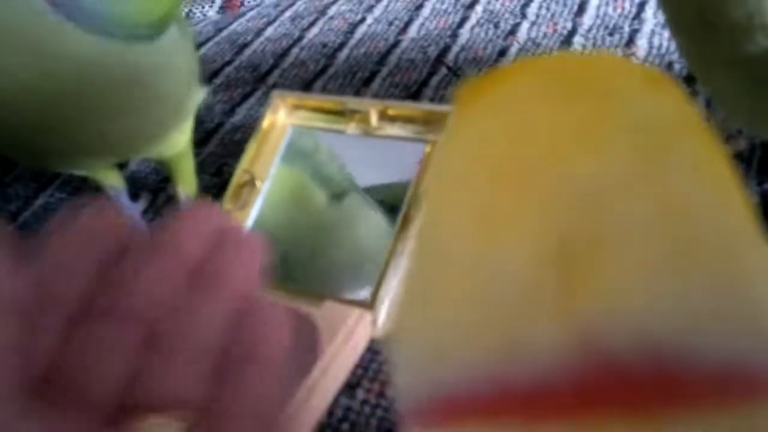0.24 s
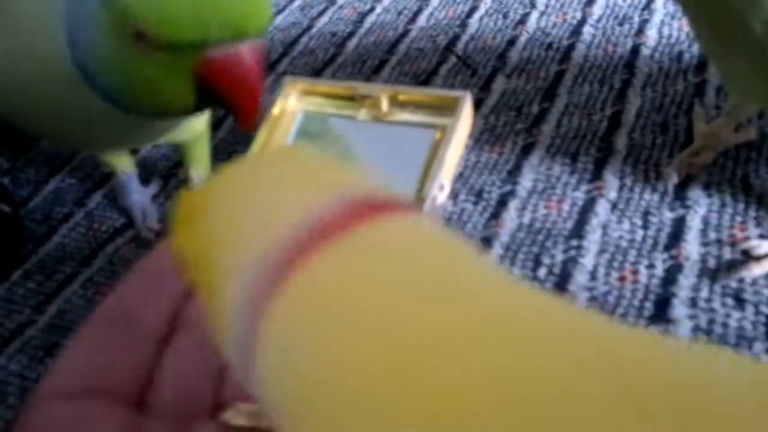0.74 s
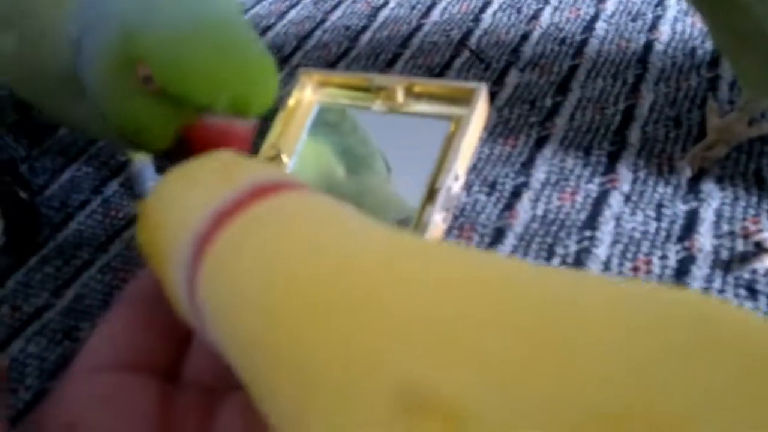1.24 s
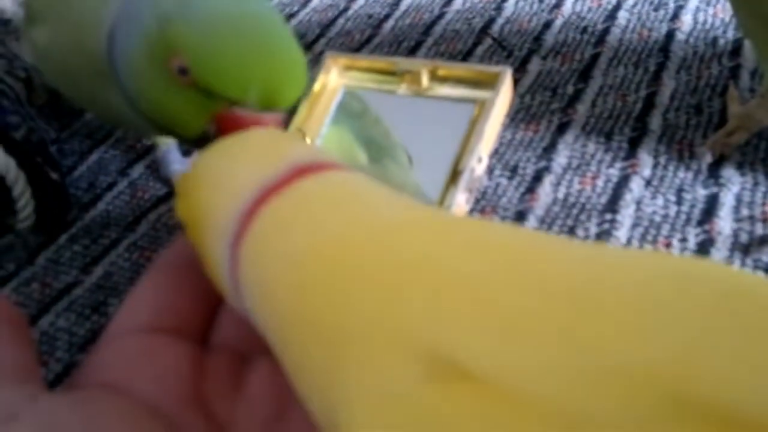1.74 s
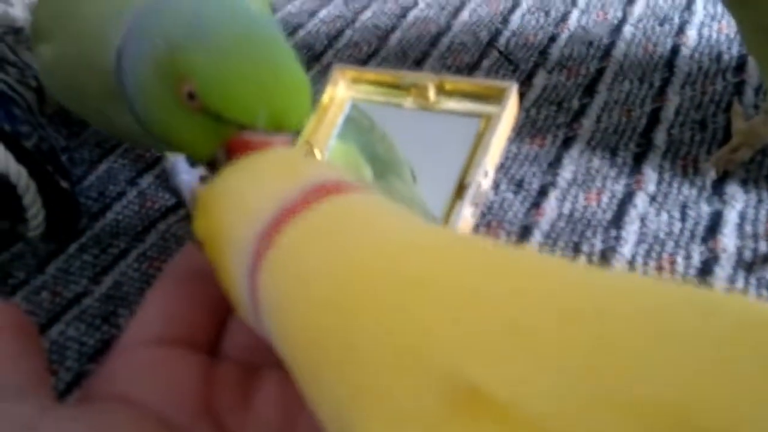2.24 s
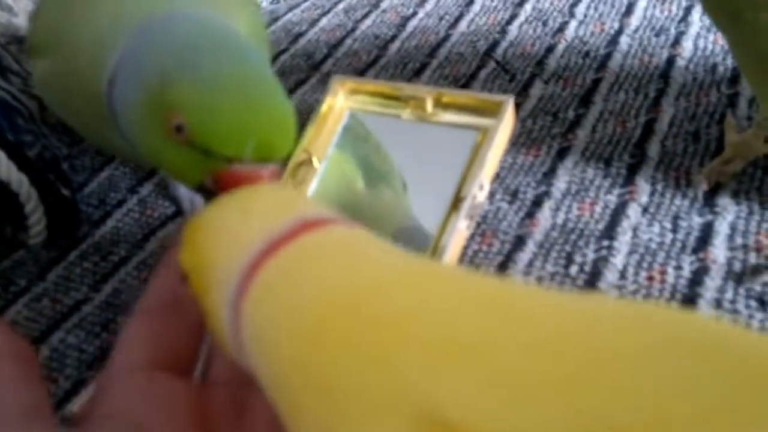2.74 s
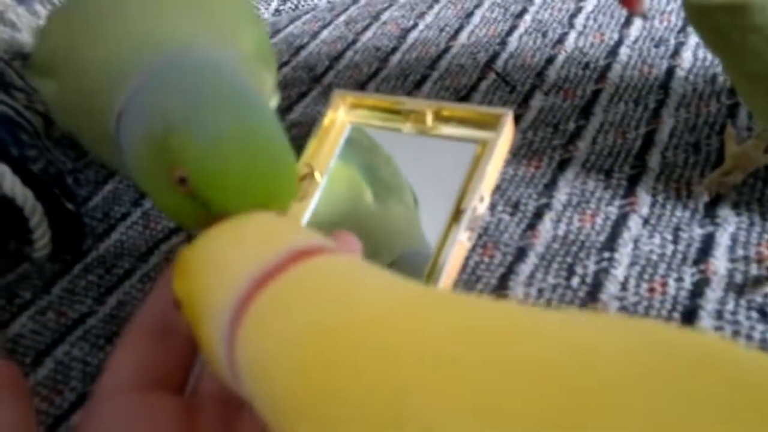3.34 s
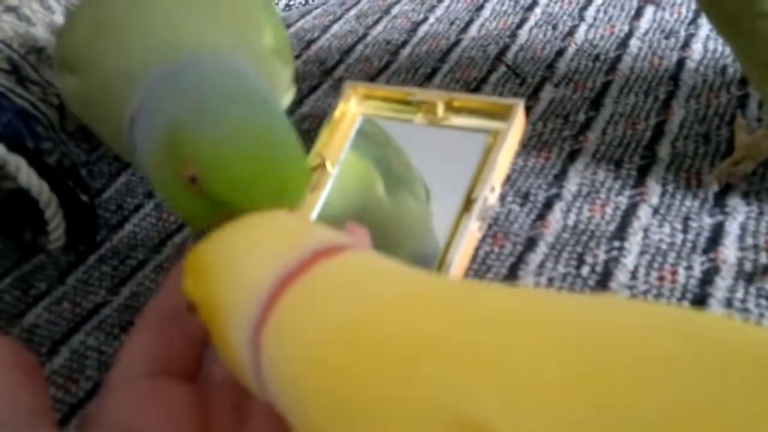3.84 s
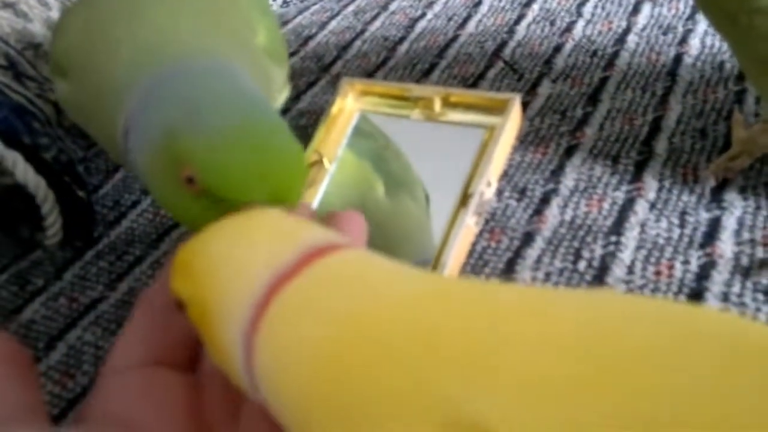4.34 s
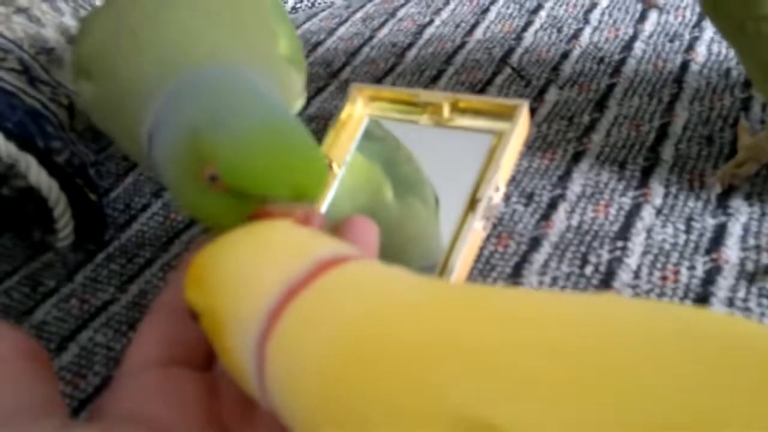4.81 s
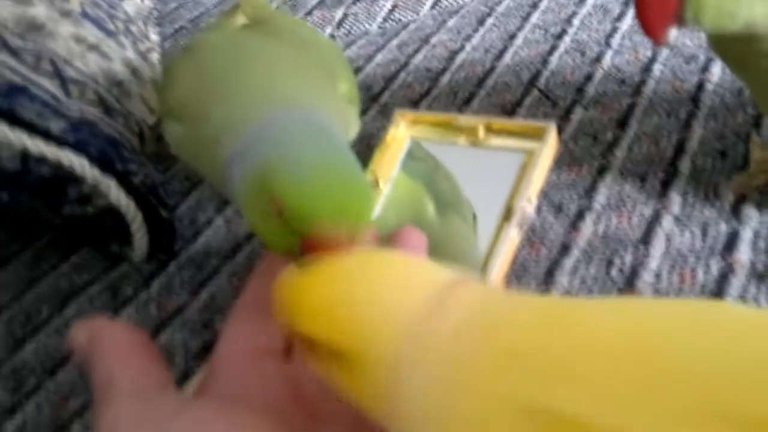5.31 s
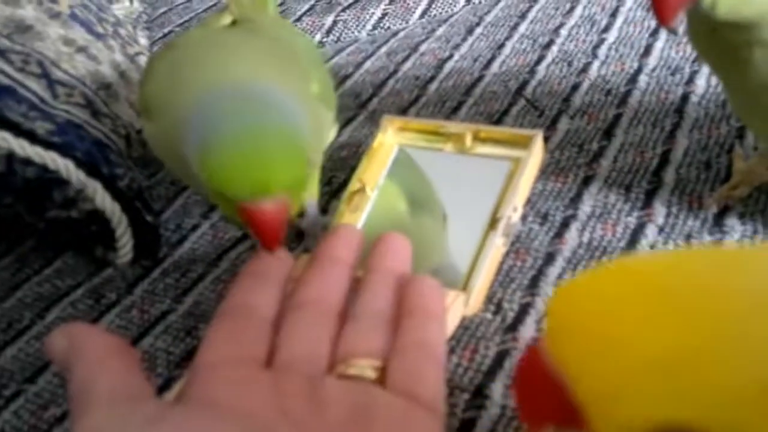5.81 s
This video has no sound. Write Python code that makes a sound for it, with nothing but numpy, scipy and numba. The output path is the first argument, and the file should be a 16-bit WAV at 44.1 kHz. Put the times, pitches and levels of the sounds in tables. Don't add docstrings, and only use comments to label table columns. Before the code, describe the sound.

Sharp, dry parrot clucks about four per second build from faint peeps to a loud middle, then die away over soft hiss indoors.

```python
import sys
import numpy as np
from scipy import signal
from scipy.fft import rfft, irfft
from scipy.io import wavfile
from scipy.ndimage import uniform_filter1d
from numba import njit

SR = 44100
rng = np.random.default_rng(int(sys.argv[2]) if len(sys.argv) > 2 else 0)


def persist_wave(psi):
    counts = np.round(np.clip(psi, -1, 1) * 32767).astype(np.int16)
    wavfile.write(sys.argv[1], SR, np.atleast_2d(counts).T)


def linear_from_db(decibels):
    return 10 ** (np.asarray(decibels, float) / 20)


N = 267334
TIME = np.arange(N) / SR
SIDES = np.array([[1], [-1]])


# (start [s], length [s], effort after attack [dB], effort before release [dB], tone [Hz])
NOTES = [(0.822, .022, -50, -65, 2616), (1.16, 0.032, -49.5, -59.5, 2580), (1.35, .024, -23, -44, 2510),
         (1.59, 0.065, -20, -34.5, 2700), (1.813, .054, -20, -27.5, 2600), (2.041, .049, -16.5, -18, 2500),
         (2.278, 0.049, -21.5, -15, 2834), (2.538, 0.038, -14, -18, 2527), (2.776, 0.042, -24.5, -17, 2580),
         (3.029, .039, -21.5, -23, 2498), (3.268, .04, -28, -28, 2280), (3.528, .043, -23.5, -19.5, 2436),
         (3.785, 0.043, -16.5, -22, 2834), (4.043, .04, -28, -20, 2474), (4.302, .045, -23.5, -12.5, 2720),
         (4.594, .058, -33.5, -46.5, 1850), (4.891, 0.043, -22.5, -42, 1679),
         (5.167, .042, -42, -49.5, 1680), (5.437, .033, -56.5, -57, 2480)]
# (multiple of the tone [1], width [Hz], level [dB])
THROAT_MODES = [
    (1., 300, 0),
    (.75, 500, -12),
    (1.5, 500, -20),
]
# (centre [Hz], width [Hz], level [dB])
UPPER_MODES = [
    (3350, 450, 0),
    (3850, 500, -2),
    (4800, 800, -13),
]
# (multiple of the pipe resonance [1] or fixed centre [Hz], width [Hz], level [dB])
WINDPIPE_MODES = [
    (1., 280, 0),
    (1.45, 400, -7),
    (600, 200, -7),
]
# (centre [Hz], width [Hz], level [dB])
BEAK_MODES = [
    (6100, 1100, -1),
    (8000, 900, -13),
    (10300, 1600, 0),
    (14200, 600, -17),
]
# (centre [Hz], width [Hz], level [dB])
RASP_MODES = [
    (1500, 800, 4.5),
    (3000, 1660, -0.5),
    (5000, 2600, -12),
]


def clucks():
    gate, columns = play([cluck(*note) for note in NOTES], 0.008)
    effort_db, tone_hz, upper_db, pipe_hz, pipe_db, beak_db, rasp_db = columns
    drive = pops(1200, 4.2, 1.38)
    gain = gate * linear_from_db(effort_db)
    slack = np.maximum(2600 / tone_hz, 1) ** 3
    throat = [(m * tone_hz, width * slack, db) for m, width, db in THROAT_MODES]
    windpipe = [(m * pipe_hz if m < 10 else m, width, db) for m, width, db in WINDPIPE_MODES]
    voice = 0.71 * ring(drive, gain, throat)
    voice = voice + ring(drive, gain * linear_from_db(upper_db), UPPER_MODES)
    voice = voice + ring(drive, gain * linear_from_db(pipe_db), windpipe)
    hiss_db = beak_db - 8.5 + 4.0 * walk(140)
    voice = voice + ring(pops(3000, 1.5, 3.7), gain * linear_from_db(hiss_db), BEAK_MODES)
    voice = voice + ring(drive, gain * linear_from_db(rasp_db), RASP_MODES)
    puff_modes = [(203, 220, 0), (70, 80, -3)]
    puff = [ring(rng.standard_normal(N), gain * linear_from_db(-35.5), puff_modes) for _ in SIDES]
    return voice * linear_from_db(-0.5) + strong_pops(), np.array(puff)


# (time [s], windpipe [Hz], windpipe level [dB], beak gape [dB], rattle [dB])
NECK = [(1.0, 1020, 1.5, -21, -26), (1.36, 880, -6.5, -28, -11.5), (1.62, 1100, -11.5, -36, -12.5),
        (1.82, 1110, -11, -38, -12.5), (1.85, 690, -8, -37, -14.5), (2.06, 1030, -13.5, -30, -14),
        (2.31, 622, -14, -30.5, -13), (2.56, 1030, -13.5, -31, -16), (2.8, 616, -12.5, -27, -11),
        (3.05, 1100, -14, -37, -12), (3.29, 1275, -10, -23, -9.5), (3.8, 1130, -15, -43.5, -14.5),
        (4.07, 1160, -15.5, -35, -9), (4.33, 765, -13, -29, -9.5), (4.61, 820, -0.5, -10.5, 5.5),
        (4.9, 1002, -6, -28, -9), (5.18, 845, 2.5, -17, 3.5), (5.45, 965, 4.5, -13.5, 1.5)]
UPPER_OPENING = [-15, -16, -4.5, -8]
PIPE_OPENING = [-2, -0.5, 3, 1.5]
BEAK_OPENING = [3, 4.5, -4.5, 2.5]


def cluck(s, length, early_db, late_db, hz):
    attack_s, release_s = 0.0073, 0.016
    onset_db, fade_db = -16.5, -16.5
    tension_rise_per_s = 0.92
    hold_end = max(length - release_s, attack_s + 0.0011)
    t = np.array([0, attack_s, hold_end, max(length, attack_s + 0.002)])
    neck_s, *posture = np.transpose(NECK)
    pipe_hz, pipe_db, gape_db, rasp_db = (np.interp(s + t, neck_s, c) for c in posture)
    effort_db = [early_db + onset_db, early_db, late_db, late_db + fade_db]
    return np.transpose([s + t, effort_db, hz * (1 + tension_rise_per_s * t), UPPER_OPENING,
                         pipe_hz, pipe_db + PIPE_OPENING, gape_db + BEAK_OPENING, rasp_db])


# (time [s], peak [dB], pitch [Hz], rebound level [dB])
STRONG_POPS = [(1.3597, -17, 2680, -15), (1.5986, -12.5, 2495, -1.5), (1.6228, -18, 3010, 0),
               (1.8212, -10.5, 2256, -30), (1.8473, -7, 2717, 0.5), (2.0516, -8, 2480, -29),
               (2.0598, -2.5, 2690, -32), (2.0727, -10, 2850, 3.5), (2.2876, -13.5, 2490, -32),
               (2.299, -5, 2896, -5), (2.309, -12, 3120, -30.5), (2.3166, -4.5, 2914, -30),
               (2.545, -12, 2600, -27.5), (2.553, -6.5, 2550, -27), (2.5626, -8, 2690, -2),
               (2.789, -7.5, 2710, -31), (2.797, -6, 2627, -30), (2.8046, -7, 2840, -27),
               (3.045, -15, 2423, 7), (3.2802, -16, 2300, 4), (3.2923, -19.5, 2570, -31.5),
               (3.5383, -13, 2420, -2), (3.5506, -13, 2340, 5), (3.794, -11, 2650, 1),
               (4.055, -15, 2295, -1.5), (4.0742, -15, 2850, -34), (4.3163, -14.5, 2370, 3.5),
               (4.3266, -10.5, 3035, -3.5), (4.6015, -24, 2810, -27), (4.9013, -26, 2020, -34.5)]


def strong_pops():
    rebound_s, rebound_pitch = 0.0048, 1.2
    first = [(s, db, hz) for s, db, hz, _ in STRONG_POPS]
    rebound = [(s + rebound_s, db + more_db, hz * rebound_pitch) for s, db, hz, more_db in STRONG_POPS]
    return accents(first + rebound, 0.0013, 0.002, 7.0, 1.1)


# (time [s], peak [dB], pitch [Hz])
PEEPS = [
    (.834, -52, 2545),
    (1.033, -60, 2510),
    (1.176, -38, 2720),
]


def peeps():
    return accents(PEEPS, 0.0017, 0.0047, 0.46, 0.355)


def pops(rate, scatter_db, breath):
    chance = rng.random(N) < rate / SR
    train = unit(chance * linear_from_db(scatter_db * rng.standard_normal(N)))
    return unit(train + breath * rng.standard_normal(N))


def accents(table, rise_s, fall_s, glide, partner):
    lead = 300
    out = np.zeros(N)
    t = TIME[:3 * lead] - lead / SR
    for s, db, hz in table:
        turn = 2 * np.pi * rng.random(2)
        phase = 2 * np.pi * hz * t * (1 + glide * t)
        wave = np.sin(0.97 * phase + turn[0]) + 0.3 * np.sin(partner * phase + turn[1])
        swell = np.exp(-(t / np.where(t < 0, rise_s, fall_s)) ** 2)
        i = int(s * SR) - lead
        out[i:i + len(t)] += linear_from_db(db) * wave * swell
    return out


# (time [s], peak [dB], main pitch [Hz], length [s], treble level [dB])
TICKS = [(0.101, -51, 2340, 0.033, -41), (0.133, -40, 2250, 0.031, -46), (1.342, -52, 2950, 0.0047, -0.5),
         (1.418, -51, 2650, 0.027, -18), (1.558, -39.5, 2450, 0.02, -19.5), (1.731, -56, 1910, 0.011, -33),
         (2.91, -35.5, 2310, 0.019, -25.5), (2.921, -40, 1930, 0.021, -45),
         (3.171, -39.5, 2260, 0.029, -44), (3.2, -33.5, 1440, 0.014, -25), (3.316, -33, 3250, 0.024, -18.5),
         (3.441, -44.5, 2350, 0.03, -28), (3.477, -31.5, 2040, 0.019, -20.5), (3.726, -36, 2070, 0.06, -28),
         (3.969, -37.5, 2490, 0.03, -24), (4, -35, 3200, 0.024, -42), (4.245, -46.5, 2100, 0.015, -33),
         (4.482, -44, 2290, 0.012, -41), (4.8, -57, 3200, 0.0084, -35), (4.873, -56.5, 1500, .012, -39.5),
         (5.497, -58.5, 2800, 0.016, -38), (5.806, -38, 1583, 0.032, -12.5)]


def ticks():
    out, size = np.zeros((2, N)), SR // 12
    for s, db, hz, length, treble_db in TICKS:
        t = np.arange(size) / SR / max(length, 0.002)
        grit = rng.standard_normal((2, size)) * linear_from_db(3.5 * rng.standard_normal(size))
        grit = grit[0] + 0.84 * SIDES * grit[1]
        tick = [unit(band(g, hz, 550)) + 0.65 * unit(band(g, 960, 800)) + 0.39 * unit(band(g, 2500, 1500))
                + linear_from_db(treble_db) * unit(band(g, 7500, 3900)) for g in grit]
        i = int(s * SR) - 90
        n = min(size, N - i)
        swell = np.minimum(3 * t, 1) ** 2 * np.exp(-t ** 2)
        pan_db = 1
        out[:, i:i + n] += (linear_from_db(db - 7.0 + SIDES * pan_db / 2) * swell * tick)[:, :n]
    return out


# (time [s], length [s], centre [Hz], width [Hz], level [dB])
BRUSHES = [(.0, 0.07, 1730, 900, -59.5), (.0, 0.03, 7750, 5000, -65), (.11, 0.041, 3480, 2500, -83),
           (0.385, 0.094, 8140, 4000, -74.5), (0.643, .06, 8000, 5000, -80),
           (5.098, 0.036, 11770, 2970, -79), (5.364, 0.044, 12430, 2530, -85),
           (5.734, 0.0497, 3470, 1496, -72), (5.812, 0.051, 5360, 890, -53), (5.813, 0.03, 9650, 3500, -57),
           (5.972, 0.083, 9000, 2930, -78)]


def brushes():
    out = np.zeros((2, N))
    for s, length, hz, width_hz, db in BRUSHES:
        t = TIME[:3500] / max(length, 0.005)
        i = int(max(s, 0) * SR)
        hiss = [unit(band(rng.standard_normal(len(t)), hz, width_hz)) for _ in SIDES]
        swell = np.minimum(5 * t + 0.11, 1) * np.exp(-2.5 * t ** 2)
        out[:, i:i + len(t)] += linear_from_db(db) * swell * hiss
    return out


# (time [s], left minus right [dB], share to the walls [dB], dull share to the walls [dB])
HEAD = [(1.17, 2, -23, -6.5), (1.36, 3, -16.5, -7), (1.6, -1, -10.5, -4), (1.85, 0, -9, -5),
        (2.049, 1.5, -5, -9), (2.551, 1.5, -7.5, -10.5), (3.05, 2.5, -2, -6.5), (3.3, 0, -1.5, -6),
        (3.55, 0, -8, -7.5), (3.799, 0, -6, -2), (4.062, 2.5, -7.5, -4), (4.32, 3, -11.5, -3.5),
        (4.6, 5.5, -7, -16.5), (4.9, -2, -10, -21.5), (5.18, 2, -13, -26), (5.451, 14, -3.5, -18.5)]


def turned_head():
    s, *columns = np.transpose(HEAD)
    return [np.interp(TIME, s, c) for c in columns]


def close_echoes(voice):
    out, t = np.zeros((2, N)), TIME[:600]
    for s, length, *_ in NOTES:
        i, j = int((s - 0.01) * SR), int((s + length + 0.03) * SR)
        for side in out:
            arrivals = rng.random(len(t)) < 4000 / SR
            taps = arrivals * rng.standard_normal(len(t)) * np.exp(-t / 0.0025) * 0.8
            taps[0] = 1
            side[i:j + len(t) - 1] += np.convolve(voice[i:j], taps / np.linalg.norm(taps))
    return out


# (centre [Hz], time to fall 60 dB [s], level [dB])
ROOM = [(523, 0.21, -19), (990, 0.45, -24.5), (1600, 0.29, -13), (2220, 0.33, -21), (3330, 0.089, -22.5),
        (3170, 0.19, -17.5), (4000, 0.15, -15.5), (5000, 0.22, -14.5), (9000, 0.2, -23.5)]


def room(x):
    t = TIME[:SR // 2]
    out = []
    tails = [sum(linear_from_db(db - 60 * t / t60) * band(rng.standard_normal(len(t)), hz, 0.5 * hz)
                 for hz, t60, db in ROOM) for _ in SIDES]
    for tail in tails:
        response = tail * np.minimum(t / 0.00067, 1) * linear_from_db(-20.5)
        out.append(signal.fftconvolve(x, response)[:N])
    return np.array(out)


# (start [s], rise [s], fall [s], peak [dB], pitch [Hz])
FAR_RASPS = [
    (.24, 0.045, 0.088, -63.5, 1860),
    (0.631, 0.036, .11, -61, 1850),
    (1.46, 0.042, 0.082, -72.5, 1600),
    (1.769, 0.065, 0.024, -49, 1375),
    (5.66, .04, .03, -72.5, 1440),
    (5.732, .035, 0.071, -58.5, 1378),
]


def far_bird():
    edge_db = -26
    tables = [[(s, db + edge_db, hz), (s + rise, db, hz), (s + rise + fall, db + edge_db, hz)]
              for s, rise, fall, db, hz in FAR_RASPS]
    gate, (db, hz) = play(tables, 0.012)
    modes = [(hz, 700, 0), (hz * 1.283, 600, -4), (4700, 600, -20)]
    return 3.75 * np.array([ring(pops(1900, 1.3, 1.8), gate * linear_from_db(db), modes) for _ in SIDES])


# (time [s], level [dB])
WHISTLE = [
    (0, -48),
    (.04, -55.5),
    (.1, -74),
    (.14, -64),
]


def whistle():
    whistle_hz, beat_hz = 2620, 55
    gate, (db,) = play([WHISTLE], 0.0035)
    phase = 2 * np.pi * whistle_hz * TIME
    throb = np.array([np.cos(2 * np.pi * beat_hz * TIME + lag) + 1.8 for lag in (0.3, 1.3)])
    octave = 0.68 * np.exp(-TIME / 0.011) * np.sin(2.02 * phase)
    pure = throb * gate * linear_from_db(db) * (np.sin(phase) + octave)
    modes = [(whistle_hz, 120, 0), (1.8 * whistle_hz, 300, -14), (4600, 900, -19)]
    echo = [ring(rng.standard_normal(N), gate * linear_from_db(db + 1.5), modes) for _ in SIDES]
    return 1.4 * pure + np.array(echo)


# (frequency [Hz], density [dB per Hz])
AIR = [(15, -33), (25, -8), (69, -13), (107, -19.5), (253, -18), (322, -26.5), (359, -25), (804, -27.5),
       (1140, -29), (3090, -34.5), (15500, -51.5)]


def air():
    air_db = -72
    hiss = unit(colour(rng.standard_normal((2, N)), AIR))
    rumble = np.array([unit(band(rng.standard_normal(N), 61, 40)) for _ in SIDES])
    rumble_db = air_db - 4 + 3.5 * walk(13)
    return linear_from_db(air_db + 2.5) * hiss + linear_from_db(rumble_db) * (rumble + 0.4 * rumble[0])


@njit
def svf(x, g, k):
    y, b, l = np.empty(len(x)), 0., 0.
    for i in range(len(x)):
        v = (b + g[i] * (x[i] - l)) / (1 + g[i] * (g[i] + k[i]))
        b, l, y[i] = 2 * v - b, l + 2 * g[i] * v, k[i] * v
    return y


def band(x, hz, width_hz):
    g = np.tan(np.pi * hz / SR) + 0 * x
    k = 1.282 * width_hz / hz + 0 * x
    return svf(svf(x + 1e-18, g, k), g, k)


def ring(drive, gain, modes):
    live = uniform_filter1d(1. * (gain > 1e-9), size=1500) > 1e-4

    def through(x):
        total = 0
        for k, (hz, width, db) in enumerate(modes):
            mode = band(x[live], (hz + 0 * x)[live], (width + 0 * x)[live])
            total = total + (-1) ** k * linear_from_db(db) * mode
        return total

    out = np.zeros(N)
    out[live] = through(drive * gain) / np.std(through(drive))
    return out


def unit(x):
    return x / np.sqrt(np.mean(x ** 2))


def colour(x, points):
    hz, db = np.transpose(points)
    f = np.maximum(np.fft.rfftfreq(x.shape[-1], 1 / SR), 1)
    return irfft(rfft(x) * linear_from_db(np.interp(np.log(f), np.log(hz), db)), x.shape[-1])


def play(tables, edge_s):
    s, *columns = np.concatenate(tables).T
    gate = sum((TIME >= t[0][0]) & (TIME < t[-1][0]) for t in tables)
    size = max(int(edge_s * SR), 1)
    return uniform_filter1d(np.minimum(gate, 1.), size), [np.interp(TIME, s, c) for c in columns]


def walk(rate):
    k = int(SR / rate)
    held = np.repeat(rng.standard_normal(N // k + 1), k)
    return unit(uniform_filter1d(uniform_filter1d(held, k), k)[:N])


def scene():
    voice, puff = clucks()
    pan_db, wet_db, dull_db = turned_head()
    small = ticks()
    send = voice * linear_from_db(wet_db) + band(voice, 1748, 1000) * linear_from_db(dull_db + 6) + 0.5 * small.mean(axis=0)
    near = close_echoes(voice) * linear_from_db(SIDES * pan_db / 2) + puff + small + peeps()
    return near + brushes() + room(send) + far_bird() + whistle() + air()


# (frequency [Hz], left minus right [dB])
PORTS = [(200, 2), (700, 5.5), (1300, -3), (4400, 0.5), (8000, 11.5), (15000, 8)]


def shade_ports(dry):
    left = colour(dry[0], [(hz, db / 2) for hz, db in PORTS])
    right = colour(dry[1], [(hz, -db / 2) for hz, db in PORTS])
    return np.array([left, right])


def band_limit(x):
    return signal.sosfilt(signal.butter(12, 16270, fs=SR, output="sos"), x)


def record(dry):
    mix = shade_ports(dry)
    return band_limit(mix)


dry = scene()
out = record(dry)
persist_wave(out)
```